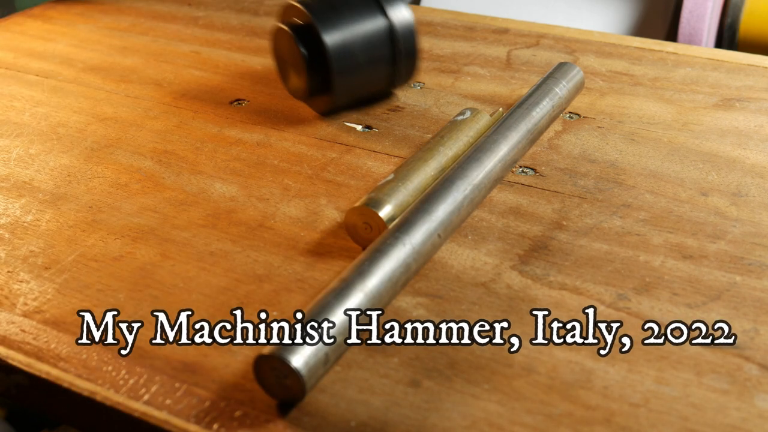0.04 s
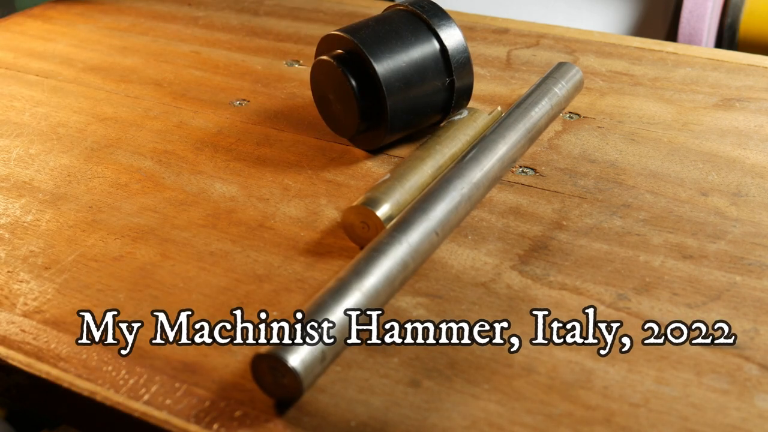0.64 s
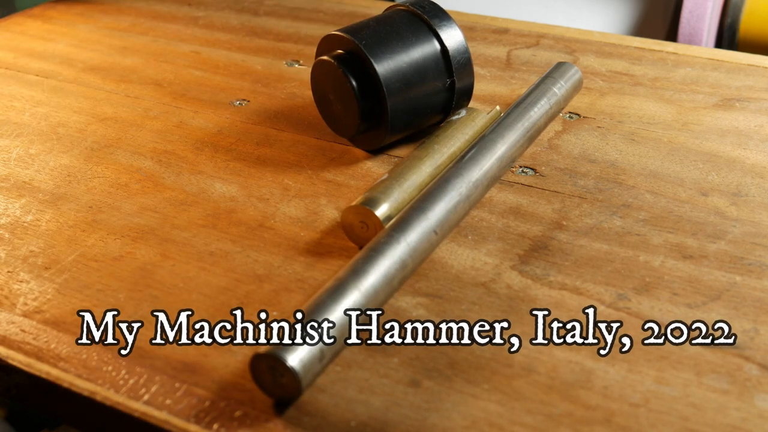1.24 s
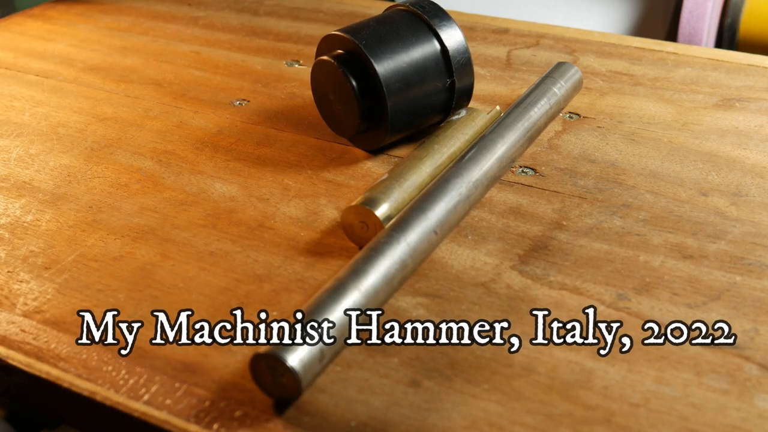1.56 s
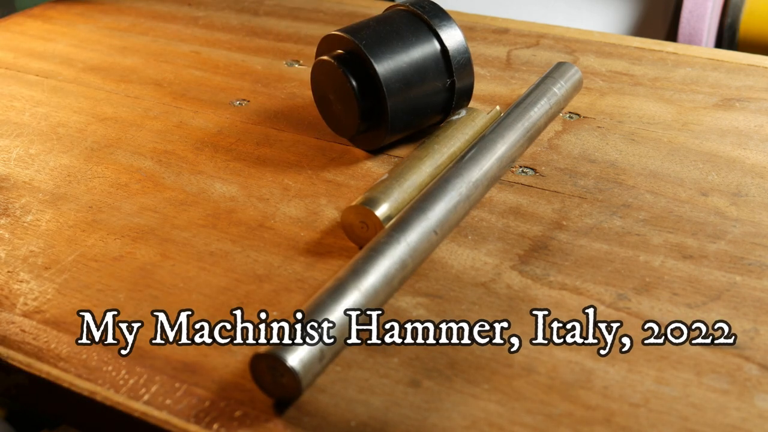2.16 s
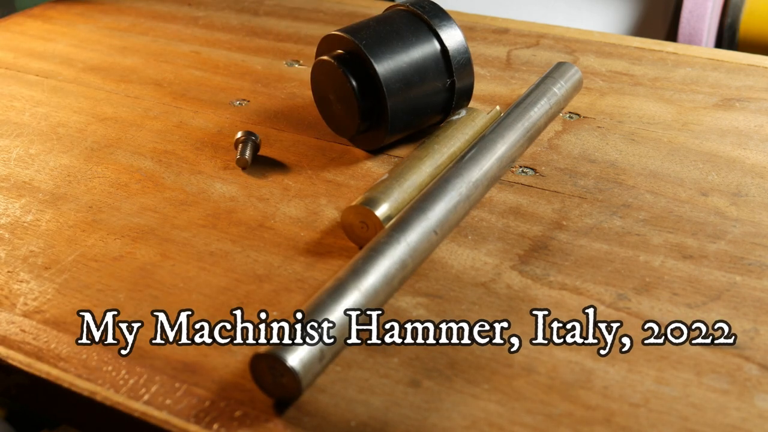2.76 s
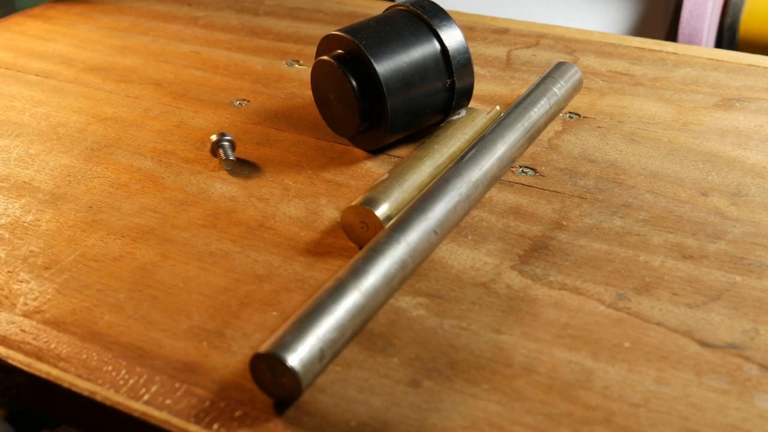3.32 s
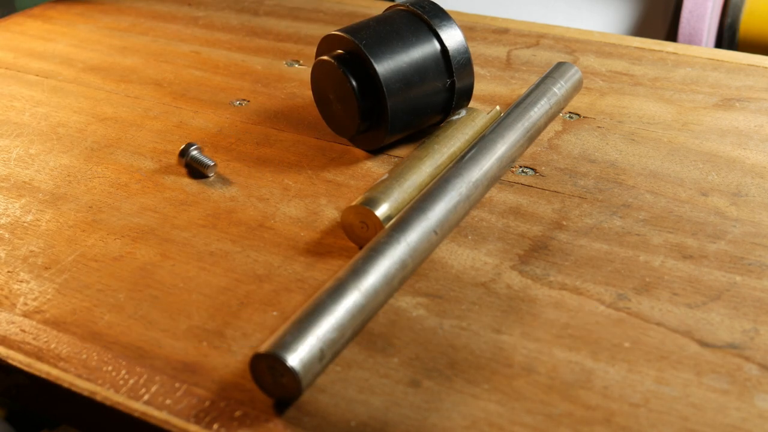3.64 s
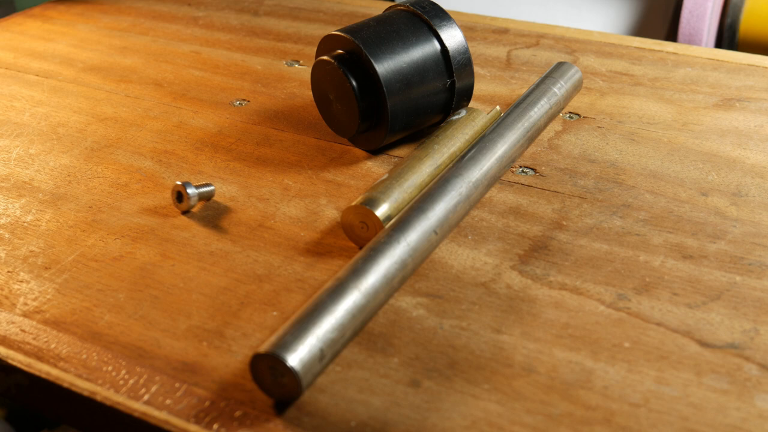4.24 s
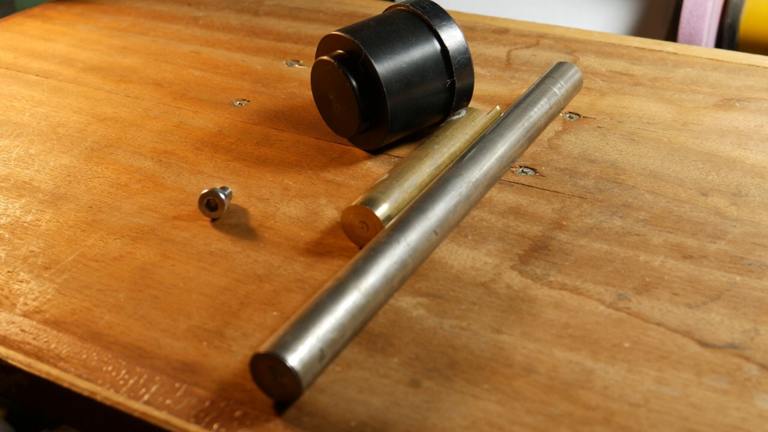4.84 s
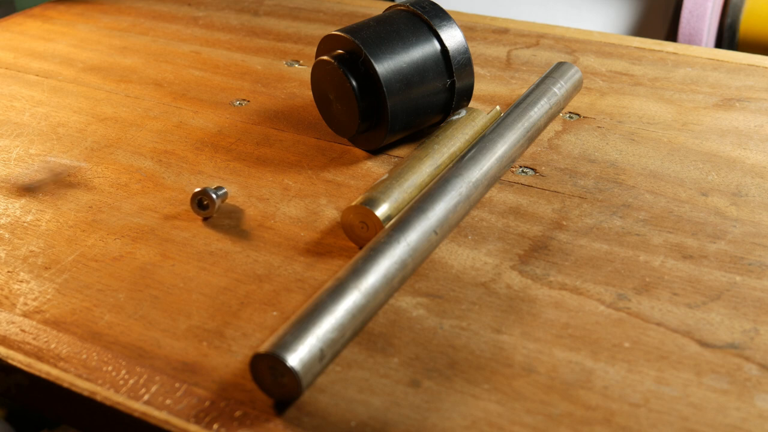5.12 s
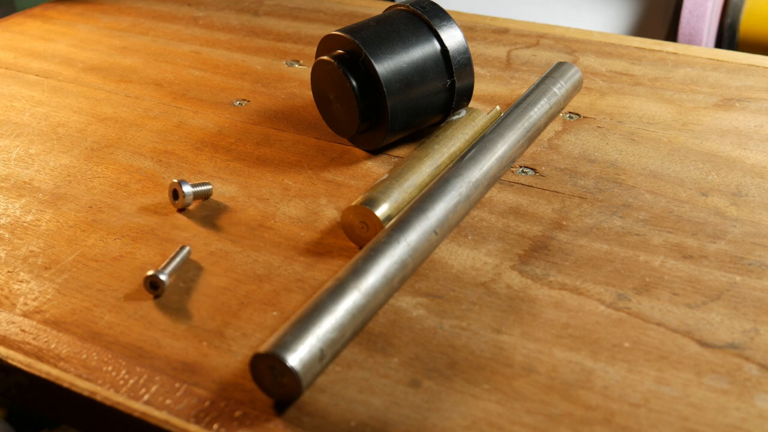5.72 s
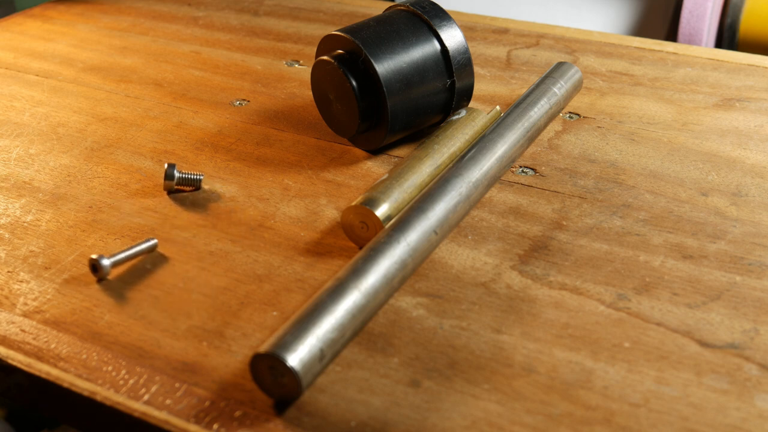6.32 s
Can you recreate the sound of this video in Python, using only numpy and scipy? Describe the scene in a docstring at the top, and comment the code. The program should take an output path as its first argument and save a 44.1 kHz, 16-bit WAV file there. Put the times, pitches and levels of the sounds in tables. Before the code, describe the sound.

Heavy steel knocks down on wood with a faint ring, followed by two small metal screws clattering and rolling over the bench.

```python
"""First comes a sharp clack over a low rumble that stops dead. A steel hammer head is then set down on a
wooden workbench: it thuds, judders and rings faintly. Two small screws skid, hop and roll across the
boards, their threads chattering over the grain. Hammer and screws shake the same nearby bench, so they
share its ringing notes. Behind them are soft bumps, fingers, a sleeve, a ticking wall clock and the
quiet air of a small workshop."""
import sys
import numpy as np
from scipy import signal
from scipy.fft import rfft, irfft
from scipy.io import wavfile

SR = 44100
rng = np.random.default_rng(int(sys.argv[2]) if len(sys.argv) > 2 else 0)


def int16_out(signal):
    """Quantize to a 16-bit WAV file."""
    q = np.round(np.clip(np.atleast_2d(signal).T, -1, 1) * 32767)
    wavfile.write(sys.argv[1], SR, q.astype(np.int16))


N = 281358
T = np.arange(N) / SR
RING_T = T[:SR * 4 // 5]  # 0.8 seconds, the time given to one ring or echo

# The notes the bench rings at, called its modes. Each row: pitch in Hz, level in dB under the hammer,
# level in dB along the path of the screws. In all tables, levels only compare one row with another.
BENCH = [(180, -16, -36), (268, -3, -12), (305, -20, -10), (335, -5, -24), (391, -15, -8), (426, -6, -16),
         (461, -8, -24), (534, 0, -14), (572, -6, -10), (675, -2, -6), (750, -1, -7), (848, -7, -12),
         (996, 1, -3.5), (1026, -3, -1), (1134, -11, -5), (1187, 0, -12), (1214, -16, -8), (1252, -9, -11),
         (1326, -1, -20), (1352, -4, -5), (1486, -24, -12), (1567, -21, -11), (1772, -14, -3),
         (1918, -15, -11), (2112, -13, -5.5), (2153, -22, -6.5), (2195, -28, -9), (2336, -30, -10),
         (3040, -28, -15)]
BENCH_T60_S = 0.18  # a "t60" is the time a sound takes to fade by 60 dB
STEREO_WIDTH = 0.22


def undb(db):
    """Turn decibels into a number to multiply by."""
    return 10 ** (np.asarray(db) / 20)


def unit(x):
    """Scale a sound to an average (rms) level of 1."""
    return x / np.sqrt(np.mean(x ** 2))


def pan(x, db):
    """Make the left side louder than the right by this many dB."""
    return x * undb(np.array([[db], [-db]]) / 2)


def band(x, hz, kind, order=4):
    """Keep the low part, the high part or one band of a sound."""
    return signal.sosfilt(signal.butter(order, hz, kind, fs=SR, output="sos"), x)


def noise(size, width=STEREO_WIDTH):
    """Stereo hiss; more width makes left and right less alike, except in the deep bass."""
    mid, side = rng.standard_normal((2, size))
    return mid + width * band(side, 100, "high", order=2) * np.array([[1], [-1]])


def fade(t60):
    """A level that dies away by 60 dB in t60 seconds."""
    return np.exp(-np.log(1000) * RING_T / t60)


def stroke(start, stop, attack, t60):
    """A level that rises over the attack time, holds until the stop, then dies away."""
    rise = np.clip((T - start) / attack, 0, 1)
    return rise * np.exp(-np.log(1000) * np.maximum(T - stop, 0) / t60)


def swell(s, spread):
    """A smooth hump that peaks at time s and is down to about a third one spread either side."""
    return np.exp(-np.minimum(((T - s) / spread) ** 2, 50))


def wander(rate):
    """A random curve that heads for a new value this many times a second."""
    return np.interp(T * rate, np.arange(512), rng.standard_normal(512))


def taps(rows):
    """One click for each row of time in seconds and level in dB."""
    x = np.zeros(N)
    for s, db in rows:
        x[int(max(s, 0) * SR)] += undb(db)
    return x


def grains(rate, spread_db):
    """Tiny hits of uneven strength at random times, about this many a second."""
    hits = (rng.random(N) < rate / SR) * rng.choice([-1, 1], N)
    return hits * undb(spread_db * np.clip(rng.standard_normal(N), -2, 2))


def modes(rows):
    """Fading notes from rows of Hz, dB and t60; neighbouring notes start in opposite directions."""
    return sum((-1) ** k * undb(db) * np.sin(2 * np.pi * hz * RING_T) * fade(t60)
               for k, (hz, db, t60) in enumerate(rows))


def ring(x, response):
    """Let every sample of x set off its own copy of the response (convolution)."""
    return signal.oaconvolve(np.atleast_2d(x), np.atleast_2d(response), axes=1)[:, :N]


def tint(x, colour, size=2048):
    """Shape the tone with an outline of Hz and dB points; plain hiss keeps its level."""
    hz, db = np.transpose(colour)
    grid_hz = np.maximum(np.arange(size // 2 + 1) * SR / size, 1)
    gains = undb(np.interp(np.log(grid_hz), np.log(hz), db))
    cepstrum = irfft(np.log(gains))
    # fold the second half onto the first, so the filter never sounds ahead of a hit
    cepstrum[1:size // 2] *= 2
    cepstrum[size // 2 + 1:] = 0
    response = irfft(np.exp(rfft(cepstrum)))
    return ring(x, response / np.linalg.norm(response))


def spray(impacts, decay, colour, width=STEREO_WIDTH):
    """Each hit stirs a crowd of brief vibrations: a burst of noise, never the same twice."""
    power = ring(impacts ** 2, decay ** 2)
    return tint(noise(N, width) * np.sqrt(np.abs(power)), colour)


def room(x, echo_db):
    """Add the workshop's short, wide echo, whose treble dies first."""
    hiss = noise(len(RING_T), width=0.67)
    low = band(hiss, 2404, "low", order=1)
    onset = np.clip(RING_T / 0.007 - .4, 0, 1)
    tail = (low * fade(t60=0.48) + (hiss - low) * fade(t60=0.31)) * onset
    return x + undb(echo_db) * ring(x, tail / np.linalg.norm(tail[0]))


def air():
    """The quiet hush of the room, with a low drone that slowly grows."""
    # The tone of the hush. Each row: pitch in Hz, level in dB.
    hush_colour = [(15, -46.5), (25, -27), (113, -2.5), (156, -6.5), (349, 1.5), (445, -5.5), (537, -1),
                   (666, -11), (997, -13), (1570, -20.5), (7100, -26.5), (7910, -30.5), (9810, -26),
                   (15500, -38.5)]
    drone_notes = modes([(117.5, -1.0, 0.11), (203.0, -2.0, 0.25), (275.0, -7.0, 0.96)])
    drone = unit(ring(noise(N, width=0.52), drone_notes))
    hush = unit(tint(noise(N, width=0.99), hush_colour))
    return undb(-67.5) * hush + drone * undb(-82.5 + 2.5 * T)  # the drone gains 2.5 dB a second


def clock():
    """A far wall clock ticks about once a second; the room smears and widens each tick."""
    # The ticks. Each row: time in seconds, level in dB.
    beats = [(.811, -59.5), (1.808, -58), (2.811, -59.5), (3.812, -56.5), (4.811, -62), (5.811, -58)]
    # The tone of a tick. Each row: pitch in Hz, level in dB.
    tick_colour = [(250, -22), (400, 0), (500, 9), (650, -12), (1100, -4), (2200, -15), (3100, -11),
                   (4300, -25), (5500, -18), (6800, -18), (10000, -29), (14000, -46)]
    smear = (1 - np.exp(-(RING_T / 0.016) ** 2)) * (fade(0.38) + undb(4) * fade(0.52))
    return spray(taps(beats), smear / smear.max(), tick_colour, width=0.4)


def rubbed_steel(s, db, spread, hz, width_hz):
    """Rubbed steel swells and fades: a narrow band of noise rings thinly, a wide one rustles."""
    edges_hz = [hz - width_hz / 2, hz + width_hz / 2]
    return undb(db) * swell(s, spread) * unit(band(noise(N), edges_hz, "band", order=2))


def hands():
    """Fingers tick as they let go of the steel, a fingertip slides over it, and a sleeve swishes."""
    # Fingers letting go. Each row: time in seconds, level in dB.
    releases = [(0.678, -50.5), (0.692, -44), (0.8327, -53), (0.8562, -50), (0.8776, -40), (0.882, -56),
                (0.9365, -39.5), (0.9434, -40), (6.351, -61)]
    # The crisp tone of their ticks. Each row: pitch in Hz, level in dB.
    finger_colour = [(1000, -18), (3500, -18), (5500, 0.5), (9000, -4.5), (12000, -12.5), (15000, -51)]
    # Moves of the sleeve. Each row: loudest moment in seconds, level in dB, spread in seconds.
    swishes = [(0.495, -67.5, 0.063), (0.65, -70.5, 0.1), (0.879, -65, 0.093), (1.075, -74.5, 0.071),
               (1.445, -78, 0.31), (2.001, -67, 0.096), (2.96, -73.5, 0.3), (3.503, -74, 0.18),
               (4.791, -70.5, 0.035), (5.007, -60, 0.11), (5.7, -77, 0.15), (5.986, -71, 0.04),
               (6.203, -77, 0.45)]
    # The tone of the cloth. Each row: pitch in Hz, level in dB.
    cloth_colour = [(80, -10), (500, 7), (1500, 1.5), (3500, -3), (6000, -5.5), (9000, -6), (13000, -17.5),
                    (16000, -23.5)]
    ticks = spray(taps(releases), undb(-1.5) * fade(0.045) + undb(-16.5) * fade(0.32), finger_colour)
    cloth = unit(tint(noise(N, width=0.37), cloth_colour))
    movement = sum(undb(db) * swell(s, spread) for s, db, spread in swishes)
    fingertip = rubbed_steel(s=1.705, db=-80, spread=.06, hz=5100, width_hz=900)
    return undb(-10.5) * ticks + fingertip + cloth * movement


def bench_ring(hits):
    """Hits along the path of the screws set all the notes of the bench ringing."""
    return ring(hits, modes([(hz, db, BENCH_T60_S) for hz, _, db in BENCH]))


def bumps():
    """Dull nudges against the bench wake its low notes."""
    # The nudges. Each row: time in seconds, level in dB.
    nudge_times = [(.33, -51.5), (1.489, -51), (1.6, -58.5), (1.64, -66), (1.68, -81)]
    # Their dull tone. Each row: pitch in Hz, level in dB.
    thump_colour = [(50, -7.5), (140, 12), (260, -0.5), (400, 4.5), (700, -2.5), (1100, -15.5), (2200, -30),
                    (8000, -43)]
    nudges = taps(nudge_times)
    boards = band(bench_ring(nudges), 980, "low")
    soft_decay = fade(0.39) * (1 - np.exp(-RING_T / 0.0041))
    return undb(-4.0) * spray(nudges, soft_decay, thump_colour, width=.4) + undb(-20) * boards


def opening_clack():
    """A sharp clack and a small rattle over a low rumble; all of it stops dead."""
    # The clack and its rattle. Each row: time in seconds, level in dB.
    hits = [(.002, -31.5), (.0138, -17), (.0335, -29.5), (.0374, -26)]
    # The bright tone of the clack. Each row: pitch in Hz, level in dB.
    clack_colour = [(200, -5), (400, 1), (1000, -0.5), (2200, 2.5), (3000, -4), (4200, -9), (8000, -6),
                    (10000, -13), (14000, -20.5), (16000, -23)]
    # The deep tone of the rumble. Each row: pitch in Hz, level in dB.
    rumble_colour = [(20, -3), (35, -12), (67, 8.5), (80, -17), (110, -4), (170, -18), (270, -3.5),
                     (440, -24), (700, -27), (1000, -11.5), (1500, -28.5), (3000, -33.5), (15000, -49)]
    clacks = spray(taps(hits), fade(0.012) + undb(-10.0) * fade(0.049), clack_colour)
    rumble = unit(tint(noise(N), rumble_colour))
    dead_stop = np.clip((0.073 - T) / 0.00037, 0, 1)
    return (undb(-10.0) * clacks + undb(-39.0) * rumble) * dead_stop


def knocks(rows):
    """Each knock (seconds, dB, centre in Hz) rings mostly the bench notes near its centre pitch."""
    falloff_db_per_octave = 34.5
    hz, _, path_db = np.transpose(BENCH)
    notes = np.sin(2 * np.pi * hz[:, None] * RING_T) * fade(BENCH_T60_S)
    directions = np.sign(rng.standard_normal((len(rows), len(hz))))
    out = np.zeros(N + len(RING_T))
    for (s, db, centre), direction in zip(rows, directions):
        blend = direction * undb(path_db - falloff_db_per_octave * np.abs(np.log2(hz / centre)))
        blend /= np.linalg.norm(blend)
        start = int(s * SR)
        out[start:start + len(RING_T)] += np.sqrt(2) * undb(db) * blend @ notes
    return out[:N]


def rocking():
    """Light touches, most from the first screw rocking to rest, each wake a few notes of the bench."""
    # The touches. Each row: time in seconds, level in dB, centre pitch in Hz.
    touches = [(.16, -55.5, 407), (.178, -56, 497), (3.69, -58.5, 328), (3.829, -72, 473),
               (3.993, -59, 480), (4.15, -61.5, 927), (4.29, -70.5, 990), (4.41, -74, 995),
               (4.555, -65, 540), (4.63, -67, 332)]
    return room(undb(-2.0) * knocks(touches), echo_db=-5.5)


def rolling():
    """A screw rolls on its head in slow arcs and mutters in the boards, duller as it slows."""
    # The arcs. Each row: loudest moment in seconds, level in dB, spread in seconds.
    arcs = [(2.754, -62.5, 0.088), (3.4, -66.5, 0.35), (3.7, -58, 0.64), (4.686, -66.5, 0.13),
            (6.016, -53, 0.19)]
    # The tone of the rolling. Each row: pitch in Hz, level in dB.
    roll_colour = [(50, -36), (100, -17), (200, -8.5), (330, 9), (600, -2), (1100, -5), (2000, -11),
                   (6000, -19), (14000, -50)]
    contacts = grains(rate=500, spread_db=3)
    boards = unit(band(bench_ring(contacts), 960, "low", order=2))
    mutter = unit(spray(contacts, fade(0.15), roll_colour, width=0.52))
    patter = unit(mutter + undb(-8.5) * boards)
    speed = sum(undb(db) * swell(s, spread) for s, db, spread in arcs)
    bass = band(patter, 740, "low", order=1)
    brightness = (speed / speed.max()) ** 0.56
    return undb(-9.0) * speed * (bass + (patter - bass) * brightness)


def groan():
    """A dragging hand or screw sticks and slips, so one low note of the bench groans and wavers."""
    # The drags. Each row: start in seconds, stop in seconds, level in dB.
    drags = [(1.886, 1.928, -61.5), (1.927, 1.988, -54.5), (2.01, 2.047, -60), (2.066, 2.108, -43),
             (2.206, 2.311, -43.5), (2.36, 2.503, -52), (4.924, 5.027, -50), (5.13, 5.198, -46),
             (5.236, 5.295, -46.5), (5.314, 5.387, -48.5), (5.426, 5.452, -51.5), (5.472, 5.533, -50)]
    pitch_hz, waver, flutter_db = 390.2, 0.03, 2.2
    pressure = sum(undb(db) * stroke(start, stop, attack=0.0135, t60=0.062) for start, stop, db in drags)
    phase = 2 * np.pi * np.cumsum(pitch_hz * (1 + waver * wander(75))) / SR
    return undb(-1.5) * unit(np.sin(phase) * undb(flutter_db * wander(50))) * pressure


def travelling(contacts):
    """A moving screw crosses places where a bench note is weak, so each note comes and goes."""
    sway_db, sways_per_s = 2, 12
    decay = undb(-60 / BENCH_T60_S / SR)  # how much of a ring is left after one sample
    out = 0
    for hz, _, db in BENCH:
        turn = 2 * np.pi * hz / SR
        drive = contacts * undb(db + sway_db * wander(sways_per_s)) * rng.choice([-1, 1])
        out = out + signal.lfilter([np.sin(turn)], [1, -2 * decay * np.cos(turn), decay ** 2], drive)
    return out


def skid(parts, start, run_up, stop, db, slowing_db_per_s, boom_db, hiss_db):
    """Loudness follows the screw's speed: up during the push, slowly down as it rubs, then out."""
    # one value for each part of the chatter, low to high: boom, knock, scrape, hiss
    full_speed_db = (boom_db, -3, -3.5, hiss_db)
    run_up_rise_db = (18, 27, 14.5, 13.5)  # the high parts rise least: a slow screw mostly scratches
    leftward_db = (0, 3.5, 0.5, 0.5)
    age = T - start
    slowness = np.clip(1 - age / run_up, 0, 1)
    chatter = 0
    for part, full_db, rise_db, side_db in zip(parts, full_speed_db, run_up_rise_db, leftward_db):
        patchy_db = 1.8 * wander(30)  # the wood answers unevenly
        chatter = chatter + pan(unit(part), side_db) * undb(full_db - rise_db * slowness + patchy_db)
    braking_db = slowing_db_per_s * np.maximum(age - run_up, 0)
    return chatter * undb(db - braking_db) * stroke(start, stop, attack=0.0025, t60=0.29)


def skidding():
    """Each screw is flicked, and its thread and head chatter over the grain until the wood stops it."""
    # The flicks. Each row: start, run-up time and stop in seconds, level in dB, fading in dB per
    # second, boom of the boards in dB, hiss of the thread in dB.
    flicks = [(2.067, 0.0023, 2.518, -38, 15, -1, -12.5), (4.927, 0.17, 5.495, -36, 21, -5.5, -9.5)]
    # The tone of steel on wood. Each row: pitch in Hz, level in dB.
    scrape_colour = [(90, -31), (190, -39), (280, -16), (480, -10), (720, 0.5), (1100, -6.5), (1600, 4),
                     (2300, -1.5), (2900, -4.5), (3600, -9), (4600, -14.5), (6500, -21), (10000, -29),
                     (14000, -46)]
    contacts = grains(rate=900, spread_db=3.5)
    scratch = unit(spray(contacts, fade(0.022), scrape_colour))
    chatter = scratch + undb(5.5) * unit(travelling(contacts))
    parts = (band(chatter, 845, "low"), band(chatter, [880, 1450], "band"),
             band(chatter, [1520, 2750], "band"), band(chatter, 2750, "high"))
    return sum(skid(parts, *flick) for flick in flicks)


def board_spots(x):
    """Lively and dead spots in the boards lift or damp one band as a screw passes over them."""
    # The spots. Each row: time in seconds, spread in seconds, pitch in Hz, boost or cut in dB.
    spots = [(2.21, 0.032, 1050, -10), (2.4, .13, 1170, 8), (2.37, 0.1, 690, -3), (2.29, 0.042, 2600, -5),
             (2.465, .05, 2300, 4), (5.13, 0.026, 1080, -10.5), (5.335, .07, 1100, 9.5),
             (5.442, .02, 2900, 5.5), (5.501, 0.069, 690, 9), (5.55, .065, 2400, 0)]
    for s, spread, hz, db in spots:
        near_pitch = band(x, [hz / 1.2, hz * 1.2], "band", order=1)
        x = x + (undb(db * swell(s, spread)) - 1) * near_pitch
    return x


def screws():
    """Two screws skid and tumble; each hop gives a sharp tick, a short rattle and a ring of the boards."""
    # The hardest hops. Each row: time in seconds, tick level in dB, ring level in dB, ring pitch in Hz.
    hops = [(2.071, -53, -44, 630), (2.082, -25, -32.5, 1450), (2.087, -24.5, -40, 706),
            (2.116, -28, -35, 1340), (2.154, -25.5, -37.5, 650), (2.174, -27, -37.5, 640),
            (2.252, -27, -37, 1350), (2.309, -25.5, -40, 1240), (2.331, -37, -32, 1230),
            (2.35, -28, -31.5, 1010), (2.376, -33, -31, 1050), (2.408, -34.5, -46, 2150),
            (2.438, -36, -38, 1230), (2.464, -28.5, -48, 1520), (2.469, -40, -36, 1000),
            (2.477, -35, -35.5, 1100), (2.5, -29.5, -45, 2040), (2.513, -29, -42.5, 1070),
            (4.93, -39, -60, 2200), (4.993, -33, -45.5, 1280), (5.035, -34, -38, 1470),
            (5.083, -18.5, -33.5, 1620), (5.091, -19.5, -42, 1400), (5.112, -20, -42, 2200),
            (5.132, -15, -36, 690), (5.153, -20, -33, 1820), (5.176, -22.5, -32.5, 1900),
            (5.193, -24, -35.5, 1430), (5.22, -40, -36.5, 1120), (5.257, -33, -35.5, 1160),
            (5.312, -27.5, -34, 1010), (5.335, -28, -39, 1020), (5.37, -27.5, -37, 1010),
            (5.384, -32, -51, 1150), (5.42, -32, -42, 750), (5.449, -30.5, -48, 704),
            (5.486, -55, -46, 1710)]
    # The tone of a hop's tick and rattle. Each row: pitch in Hz, level in dB.
    hop_colour = [(100, -27), (200, -33), (300, -18), (700, -22), (1300, 4), (2000, 13), (2900, 10.5),
                  (3800, -3), (5200, -13.5), (7000, -20), (9500, -52), (14000, -46)]
    # The scraping screws' own thin rings. Each row: time in seconds, level in dB, spread in seconds,
    # pitch in Hz.
    thin_rings = [(2.11, -61, .035, 4010), (2.36, -66.5, 0.088, 3990), (2.46, -63, .022, 4140),
                  (5.093, -52.5, 0.055, 2807), (5.15, -56, 0.065, 3556), (5.393, -60, 0.071, 2860)]
    skids = undb(-5.5) * skidding()
    blows = taps([(s, db) for s, db, _, _ in hops])
    ticks = undb(-12.0) * tint(blows, hop_colour)
    rattle = undb(-14.5) * spray(blows, fade(0.05), hop_colour)
    boards = undb(-4.5) * knocks([(s, db, hz) for s, _, db, hz in hops])
    steel = sum(rubbed_steel(*row, width_hz=38) for row in thin_rings)
    wood = band(board_spots(skids + ticks + rattle) + boards, 219, "high")
    return room(wood + groan() + steel, echo_db=-12.5)


def pushes(rows):
    """Smooth, brief pushes: the longer the contact, the duller the blow."""
    force = np.zeros(N)
    for s, db, contact_ms in rows:
        hump = swell(s, contact_ms / 1000 / np.pi)
        force += undb(db) * hump / hump.sum()
    return force


def hammer():
    """The heavy head thuds down; its rim strikes and judders, the bench rings and the steel sings."""
    # The head lands and rocks. Each row: time in seconds, level in dB, contact time in milliseconds.
    landings = [(.2930, 3, 0.27), (.2981, 6, 0.45), (.3048, -1, 0.64), (.3148, -3.5, 0.3)]
    # The faint notes of the steel. Each row: pitch in Hz, level in dB, t60 in seconds.
    steel_notes = [(4412, -71, 0.75), (4368, -68.5, 0.55), (4338, -73, 0.5), (6400, -75, 0.55),
                   (6425, -81, .4), (10190, -74, .55), (10700, -78, .2)]
    # The tone of the gritty noise after a hit. Each row: pitch in Hz, level in dB.
    grit_colour = [(100, -22.5), (300, -1.5), (750, 4.5), (1300, -4.5), (1600, -19), (2100, -11.5),
                   (2700, -26), (4500, -30.5), (7000, -58.5), (14000, -66)]
    # The tone of the rim's crack. Each row: pitch in Hz, level in dB.
    rim_colour = [(500, -21.5), (1300, -6), (1900, 8), (2500, -17), (3050, -10), (3700, -28), (6000, -37),
                  (14000, -48)]
    rim_s, judder_s, judder_hz, settling_db_per_s = .3086, .023, 1000, 349
    board_flex = modes([(344.0, -1.0, 0.029), (498.0, 1, 0.044), (703.0, -0.5, 0.047)])
    thud = band(ring(pushes(landings), undb(-21.5) * board_flex), 300, "high", order=2)
    # the judder fades until the head lies flat
    settling = undb(-20.5 - settling_db_per_s * np.maximum(T - rim_s, 0))
    on_rim = stroke(rim_s, rim_s + judder_s, attack=0.0007, t60=.025)
    judder = np.sin(2 * np.pi * judder_hz * T) * settling * on_rim
    rim = taps([(rim_s, 0)])
    bench_notes = modes([(hz, db, 1.45 * BENCH_T60_S) for hz, db, _ in BENCH])
    boards = band(ring(rim, bench_notes), 3000, "low", order=2)
    first_touch = taps([(landings[0][0], -9)])
    grit = spray(rim + first_touch, fade(0.083) + undb(-14.5) * fade(0.4), grit_colour)
    crack = undb(-14.5) * tint(rim, rim_colour) + undb(-38.5) * spray(rim, fade(.04), rim_colour)
    wood = pan(thud, -1.4) + pan(judder, 1.4) + undb(-35) * boards + undb(-28.0) * grit + crack
    steel = ring(rim, modes(steel_notes))
    return room(wood, echo_db=-10.0) + room(steel, echo_db=-2.6)


def scene():
    """Everything on and around the bench, added together."""
    return (opening_clack() + hammer() + screws() + rolling() + rocking()
            + bumps() + hands() + clock() + air())


def record(dry):
    """Cut away the highest treble, above 15500 Hz."""
    return signal.sosfilt(signal.ellip(8, .2, 70, 15500, fs=SR, output="sos"), dry)


dry = scene()
out = record(dry)
int16_out(out)
```